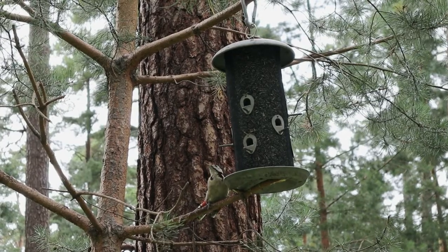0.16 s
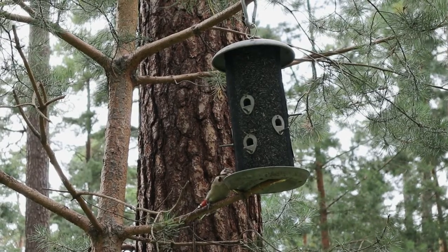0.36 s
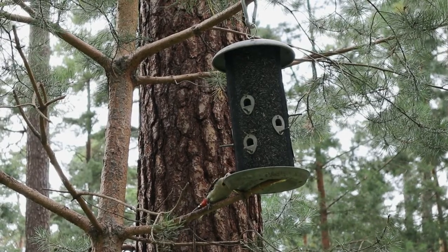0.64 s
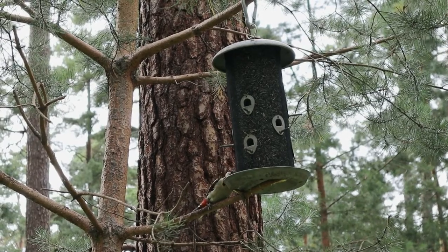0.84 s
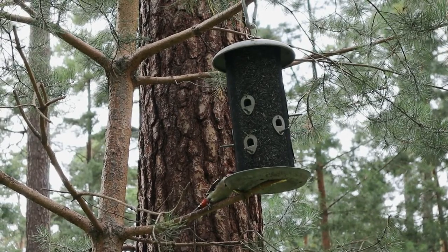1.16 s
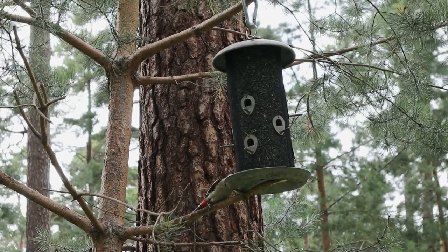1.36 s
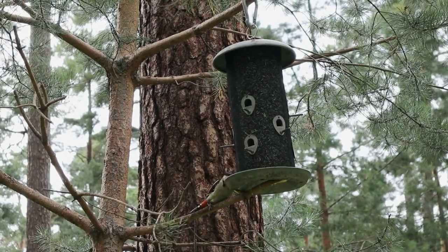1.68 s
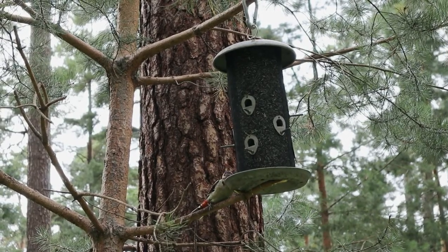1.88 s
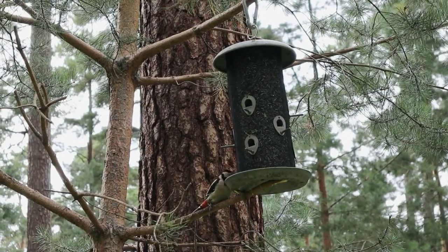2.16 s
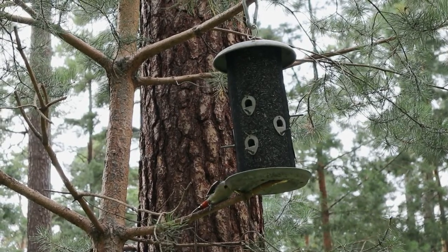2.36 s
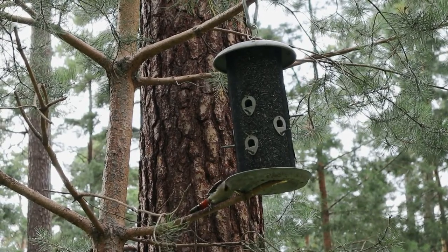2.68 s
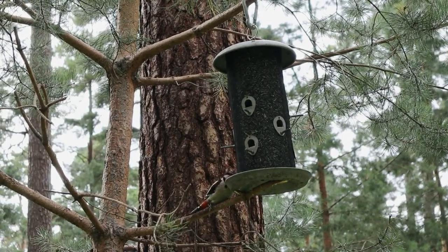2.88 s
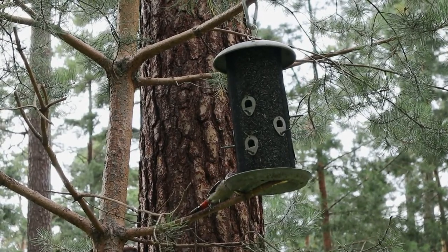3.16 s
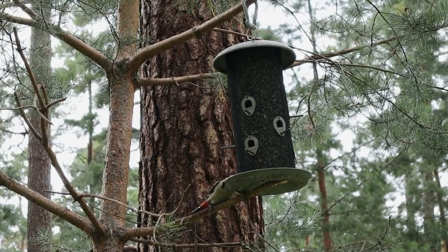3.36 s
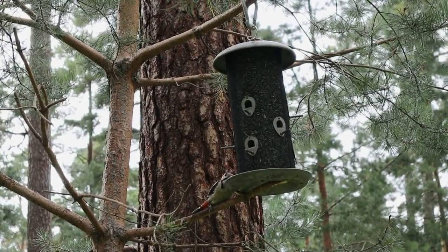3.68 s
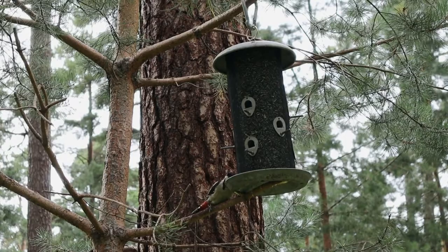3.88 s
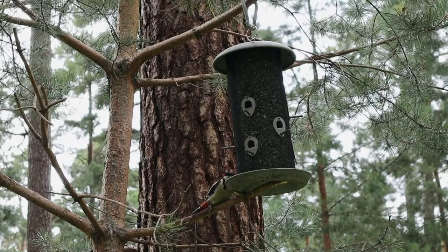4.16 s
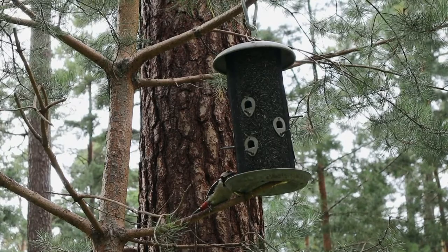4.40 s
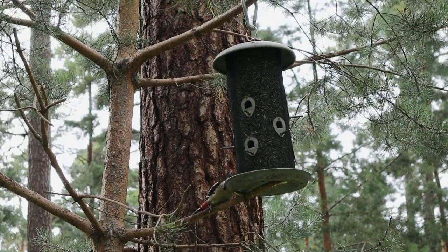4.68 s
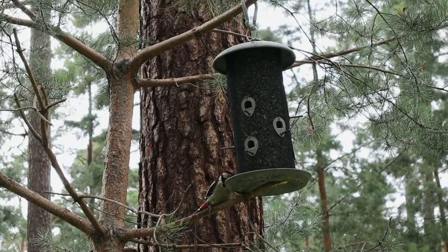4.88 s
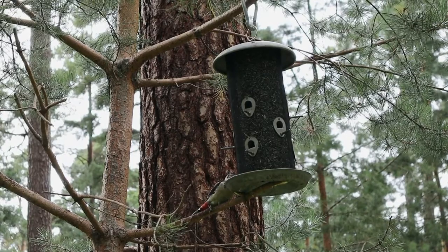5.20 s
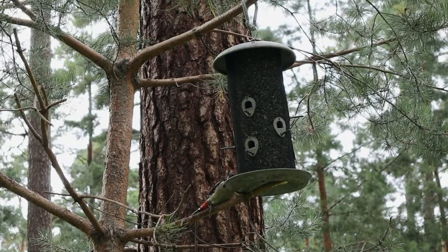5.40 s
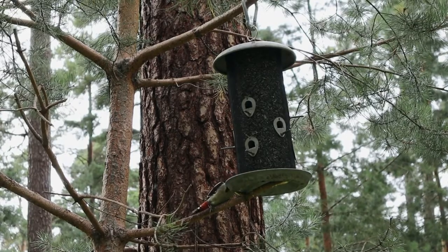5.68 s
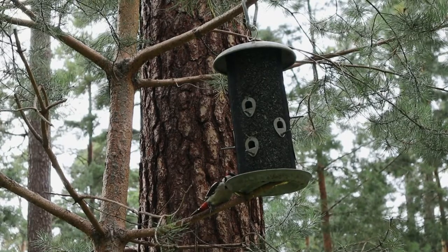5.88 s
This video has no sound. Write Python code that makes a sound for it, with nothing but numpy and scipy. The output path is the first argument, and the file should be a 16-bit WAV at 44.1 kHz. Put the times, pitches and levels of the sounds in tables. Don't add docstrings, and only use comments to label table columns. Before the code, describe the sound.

A quiet pine wood, heard through a close stereo pair: a steady, soft hum of distant traffic and air lies behind everything. In the first second, faint high trills and a few tiny bird chips, the clearest near 0.6 s, come from the side. Low wind puffs build to a strong microphone thump around 1.5 s, just as pecking begins. From 1.5 to 3.9 s a beak strikes seeds in a mesh feeder with irregular, crisp, bright cracks, densest from 2.2 to 3.3 s, preceded by short gritty scrapes and mixed with thin husk splits, falling crumbs and dull tray taps; a clear knock lands at 2.6 s. Short echoes scatter off trunks. Around 4 to 4.8 s it is nearly still, with a faint far trill, then a brighter chip at 4.8 s. Pecking resumes, with hard cracks at 5.15 and 5.5 s, small taps, last blows near 5.9 s, and more low wind buffets.

```python
import sys
import numpy as np
from scipy import signal
from scipy.io import wavfile
from scipy.ndimage import uniform_filter1d

SR = 44100
rng = np.random.default_rng(int(sys.argv[2]) if len(sys.argv) > 2 else 0)


def boost_factor(decibels):
    exponent = np.asarray(decibels, float) / 20
    return 10 ** exponent


def put_to_file(sound):
    columns = np.atleast_2d(sound).T
    safe = np.clip(columns, -1, 1)
    whole_steps = np.round(safe * 32767)
    wavfile.write(sys.argv[1], SR, whole_steps.astype(np.int16))


N = 266496

# [start t/s, end t/s, scrape level/dB, scrape f/Hz, rattle level at the end/dB]
PUSHES = [(1.488, 1.548, -61, 3550, -54.5), (1.825, 1.876, -64.5, 3500, -61.5),
          (2.15, 2.223, -64, 3450, -60.5), (2.458, 2.523, -63.5, 3680, -56.5),
          (2.776, 2.831, -70.5, 3420, -69.5), (3.038, 3.101, -64.5, 3560, -58.5),
          (3.772, 3.802, -73.5, 3577, -81.5), (4.809, 4.866, -63.5, 3940, -52),
          (5.096, 5.155, -68, 3920, -61.5), (5.446, 5.499, -65.5, 4060, -62.5),
          (5.78, 5.861, -62.5, 3520, -56)]


def evened(x):
    return x / np.sqrt(np.mean(x ** 2) + 1e-30)


def read(points, hz):
    f, value = np.transpose(points)
    return np.interp(np.log(hz + 1), np.log(f + 1), value)


def add(mix, s, sound):
    part = mix[..., round(s * SR):][..., :sound.shape[-1]]
    part += sound[..., :part.shape[-1]]


def sides(db):
    return boost_factor(np.array([[db / 2], [-db / 2]]))


def band_pass(low_hz, high_hz, x):
    return signal.sosfilt(signal.butter(2, [low_hz, high_hz], "band", fs=SR, output="sos"), x)


def field(spectrum, patchy_db, swell_db):
    # [f/Hz, correlation]
    likeness = [(60, 1), (130, .99), (290, .91), (640, .55), (1410, -.02), (3100, -.55), (6800, -.67)]
    frames, hz = N // 256 + 5, np.fft.rfftfreq(1024, 1 / SR)
    a, b, c, d, patches = rng.standard_normal((frames, 513, 5)).T
    patches = uniform_filter1d(patches, size=12, axis=0)
    patches = evened(uniform_filter1d(patches, size=14, axis=1))
    swell = evened(uniform_filter1d(rng.standard_normal(frames), size=60))
    same = np.clip(read(likeness, hz), -1, 1)[:, None]
    left, other = a + 1j * b, c + 1j * d
    z = np.array([left, same * left + np.sqrt(1 - same ** 2) * other])
    z *= boost_factor(read(spectrum, hz)[:, None] + patchy_db * patches + swell_db * swell)
    return evened(signal.istft(z, nperseg=1024, noverlap=768)[1][:, :N])


def echoes(x, against):
    # [f/Hz, t60/s]
    wood_t60 = [(2500, 0.29), (5000, 0.25), (9000, 0.15), (12300, 0.17), (12900, .03)]
    taps = rng.standard_normal((2, SR // 2)) * (rng.random((2, SR // 2)) < .12)
    taps[1] = -against * taps[0] + np.sqrt(1 - against ** 2) * taps[1]
    hz, t, z = signal.stft(taps, SR, nperseg=128)
    decay = boost_factor(-60 * t / read(wood_t60, hz)[:, None])
    tail = signal.istft(z * decay, SR, nperseg=128)[1]
    tail *= np.clip(np.arange(tail.shape[1]) / SR / 0.002, 0, 1)
    return signal.fftconvolve(x[None], tail / np.linalg.norm(tail[0]), axes=1)[:, :N]


def far_hum():
    # [f/Hz, level/dB per Hz]
    hum_spectrum = [(60, -9.5), (200, 1), (340, -6.5), (500, -7), (850, -1), (1300, -6.5), (1800, -13.5),
                    (2800, -21), (5000, -25.5), (8000, -31), (11800, -38), (12300, -49), (16000, -60.5)]
    return boost_factor(-64 + 3) * field(hum_spectrum, patchy_db=.8, swell_db=.4) * sides(-1.0)


def wind():
    # [t/s, rumble level/dB, left-right difference of the eddies/dB]
    gusts = [(0, -55.5, 4), (.4, -52, -7), (.95, -54.5, -7), (1.5, -46.5, -6), (1.9, -60, 0),
             (2.2, -56, -2), (2.6, -64, -1), (3.1, -61.5, -0.5), (3.35, -65.5, -3), (3.6, -58.5, 1.5),
             (4.199, -60.5, -2), (4.6, -56, 1), (5, -56.5, -1), (5.5, -55, -4), (6.04, -53.5, -9)]
    # [f/Hz, level/dB per Hz]
    rumble_spectrum = [(15, -15.5), (35, -2), (80, 3.5), (130, -13.5), (200, -13.5), (300, -24.5),
                       (450, -68)]
    # [t/s, peak level/dB, f/Hz, length/ms]
    strong_eddies = [(.199, -54, 68.5, 44), (.303, -46, 80, 14), (.36, -42.5, 113, 30),
                     (.453, -47, 118, 23), (.662, -53, 53.6, 37), (1.04, -49.5, 108, 41),
                     (1.111, -49.5, 70, 43), (1.267, -40.5, 90.5, 12), (1.317, -42.5, 90.5, 28),
                     (1.386, -35, 120, 20), (1.412, -35.5, 133.4, 5.4), (1.457, -25, 120, 19.5),
                     (1.479, -27.5, 157.6, 40), (1.5, -19.5, 122, 6.1), (1.59, -37.5, 177, 12),
                     (1.608, -34.5, 146, 31.6), (1.794, -38.5, 158, 48), (2.285, -46, 109, 12),
                     (3.183, -40, 143, 17.6), (3.21, -36.5, 106, 4.3), (3.514, -41.5, 118, 12),
                     (3.539, -43.5, 79, 57), (3.8, -61.5, 236, 34), (4.013, -52, 69.8, 21),
                     (4.411, -50.5, 66, 21), (4.534, -48, 101, 46), (5.095, -38.5, 61, 35),
                     (5.41, -34.5, 78, 38), (5.485, -34, 60.7, 21.5), (6.025, -44, 74.6, 27)]
    times, rumble_db, side_db = np.transpose(gusts)
    out = boost_factor(np.interp(np.arange(N) / SR, times, rumble_db))
    out = out * field(rumble_spectrum, patchy_db=3.0, swell_db=-3)

    light_db, light_hz, light_ms = -7, 75, 30
    at = .1 + (N / SR - .2) * rng.random(16)
    pitch = .8 + .4 * rng.random(16)
    light = np.c_[at, np.interp(at, times, rumble_db) + light_db, light_hz * pitch, light_ms + 0 * at]
    eddies, t = np.r_[strong_eddies, light], np.arange(-4400, 4400) / SR
    low_pass = signal.butter(4, 80, fs=SR, output="sos")
    churn = evened(signal.sosfilt(low_pass, rng.standard_normal((2, N + SR))))
    for (s, db, hz, ms), phase in zip(eddies, rng.random(len(eddies))):
        shape = np.exp(-.5 * (1000 * t / (.5 * ms)) ** 2)
        pan_db = np.interp(s, times, side_db) * hz / 120
        a, b = churn[:, round(s * SR):][:, :len(t)]
        lag = np.array([[0.00088 * hz * pan_db], [0]])
        turn = 2 * np.pi * (hz * t + phase) - lag
        eddy = ((1 + 0.34 * (a + 1j * b)) * np.exp(1j * turn)).real
        add(out, s + t[0], np.sqrt(2) * boost_factor(db) * shape * eddy * sides(pan_db))
    return out


def trills():
    # [start t/s, end t/s, f/Hz, level/dB]
    seeps = [
        (0.124, 0.264, 9200, -78),
        (0.358, 0.558, 9220, -79),
        (3.983, 4.12, 6970, -78.5),
    ]
    out = np.zeros((2, N))
    for s, end, hz, db in seeps:
        n = round((end - s) * SR)
        trill = evened(band_pass(hz * .96, hz * 1.04, rng.standard_normal((2, n)))) * np.hanning(n)
        add(out, s, boost_factor(db) * (trill - 0.62 * trill[::-1]))
    return out


def chips():
    # [t/s, length/s, top f/Hz, level/dB, left lead/rad]
    notes_sung = [
        (.166, .04, 7950, -56, 1.0),
        (.598, .047, 8050, -44, -1.6),
        (.355, .04, 4750, -69, -2.2),
        (.525, .035, 4800, -70, -2.1),
        (.655, .02, 7400, -64, 2.0),
        (.904, .02, 5400, -60, -1.8),
        (.904, .02, 10800, -67, -2.2),
        (4.787, .046, 7700, -48, -2.85),
    ]
    hook_per_s, drop_per_s = 10, 4.3
    near, far = np.zeros((2, N)), np.zeros(N)
    for s, length, top_hz, db, lead in notes_sung:
        pan_db = -3 + 1.2 * lead
        echo_db = max(-.6 * (db + 72), -12)
        hook = hook_per_s * max(length - .039, 0)
        u = np.linspace(0, 1, round(length * SR))
        bend = top_hz * (1 - np.array([hook, 0, drop_per_s * length]))
        hz = uniform_filter1d(np.interp(u, [0, .22, 1], bend), size=250, mode="nearest")
        turn = 2 * np.pi * np.cumsum(hz) / SR
        swell = np.sqrt(2) * boost_factor(db - 21 * abs(u - .65) / .65) * signal.windows.tukey(len(u), .4)
        add(near, s, swell * np.sin(turn + [[lead], [0]]) * sides(pan_db))
        add(far, s, swell * np.sin(turn) * boost_factor(echo_db))
    needles = evened(signal.oaconvolve(rng.standard_normal(N), np.hanning(70), "same"))
    return near + echoes(far * (.7 + .7 * needles), against=.5)


def crumbs(blows):
    first_db, follow, fade_db_per_s, longest_wait_s = -62.5, 0.33, -93.5, .085
    rows = []
    for (s, db, *_), waits in zip(blows, longest_wait_s * rng.random((len(blows), 4))):
        level_db = first_db + follow * (db + 35)
        rows += [(s + w, level_db + fade_db_per_s * w, 2.8, -7, 0) for w in waits]
    return rows


def beak():
    # [t/s, peak level/dB, length/ms, body below 5.5 kHz/dB, top above 9 kHz against middle/dB]
    blows = [(1.5191, -42, 1.6, -15, 14), (1.5307, -44, 5.2, -23, 0), (1.539, -30.5, 2.5, -17.5, 8),
             (1.8614, -38.5, 3, -18, 5.5), (1.8697, -31, 5.3, -16.5, 2), (2.2128, -34, 3.8, -12.5, 3),
             (2.2462, -38.5, 2.4, -11, -1), (2.285, -36, 3.4, -20, -8), (2.3674, -43, 1.8, -36, -2),
             (2.5061, -29.5, 6, -20, 12), (2.6582, -43, 1.5, -10, 1), (2.839, -35, 3.7, -26, -3.5),
             (2.8851, -37.5, 1.9, -37, 7), (2.9401, -38.5, 2.4, -12.5, -5.5), (3.0842, -32, 4.7, -16.5, 4),
             (3.2256, -32, 1.46, -26, 17), (3.8145, -32, 1.27, -15, 2.5), (5.1496, -27, 4.2, -10, 5),
             (5.49, -40, 1.7, -5, 9), (5.4962, -27, 2.35, -10.5, 21), (5.514, -36.5, 1.8, 17, -11),
             (5.5698, -38.5, 1.6, -3, 6), (5.8478, -32, 2.4, -37, 0), (5.9118, -34.5, 1.05, -40, 4)]
    # [t/s, peak level/dB, top/dB]
    husks = [(1.608, -53, 16), (1.9268, -51, 21), (2.2638, -39, 0.5), (2.2965, -48.5, 5),
             (2.3235, -55.5, -3), (2.3602, -48.5, -1), (2.433, -59.5, 16), (2.557, -49, 14),
             (2.5638, -47, 5), (2.896, -52, -8), (3.0651, -51.5, 3), (3.1794, -55.5, 5), (3.1899, -45.5, 1),
             (3.2345, -45, 8), (3.3643, -51.5, 17), (3.5831, -57.5, 9), (3.7813, -51, 1.5),
             (3.8074, -43, -3), (3.866, -58, -2), (3.9291, -62.5, 17.5), (4.8463, -51, -4),
             (4.858, -50, 12), (4.8864, -47.5, -8), (4.938, -54, 3), (4.9512, -53, -1), (5.2035, -53, 12),
             (5.759, -54.5, 5), (5.7717, -56, 2), (5.9192, -48, 12), (5.9558, -51.5, -11)]
    # [t/s, peak
    # level/dB, body/dB]
    tray_taps = [(0.635, -66.5, 6), (0.911, -69, 4), (2.1673, -60.5, 15), (2.254, -46, 2),
                 (2.303, -46.5, -14), (2.498, -51, 0), (2.605, -50, -5), (2.6251, -43, 1.5),
                 (2.648, -53, 1), (2.799, -61, 26), (2.925, -60, -2), (2.9646, -50, 8),
                 (3.0923, -41.5, -.5), (3.493, -69.5, 0), (3.8347, -53.5, 0), (4.812, -59.5, 16.5),
                 (5.138, -50.5, -12), (5.4733, -53, 8), (5.5295, -60, 23), (5.5568, -52, -1),
                 (5.577, -45.5, -16), (5.589, -46, -2), (5.601, -50.5, -13), (5.6145, -54, -9),
                 (5.6573, -65.5, 0), (5.749, -64, -1), (5.7962, -48.5, 4), (5.8633, -50, -5),
                 (5.929, -61, -10), (6.002, -65, -5)]
    husk_ms, husk_body_db = 2.95, -17.5
    tap_ms, tap_top_db = 2.5, 0.5
    rows = blows + [(s, db, husk_ms, husk_body_db, top_db) for s, db, top_db in husks]
    rows += [(s, db, tap_ms, body_db, tap_top_db) for s, db, body_db in tray_taps]
    return rows + crumbs(blows)


def crackle(spread_db, shared, count=1):
    steps = rng.standard_normal((count + 1, N // 16 + 1))
    size = boost_factor(spread_db * (.7 * steps[0] + .7 * steps[1:]))
    size = np.repeat(size, 16, axis=1)[:, None, :N]
    size /= np.sqrt(uniform_filter1d(size ** 2, size=130))
    common, own = rng.standard_normal((count, 1, N)), rng.standard_normal((count, 2, N))
    return size * (np.sqrt(shared) * common + np.sqrt(1 - shared) * own)


def causal(db):
    log = np.log(boost_factor(np.maximum(db, -100)))
    log = np.r_[log, log[-2:0:-1]]
    ring = np.fft.ifft(np.exp(log - 1j * signal.hilbert(log).imag)).real[:1024]
    return ring / np.linalg.norm(ring)


def mesh_rings():
    # [f/Hz, level/dB per Hz]
    crack = [(1500, -45), (2500, -31.5), (3100, -19), (5700, -6), (7300, 0), (9000, -1.5), (11500, -3),
             (12400, -14.5), (12800, -21), (15500, -33), (16200, -59.5)]
    # [f/Hz, width/Hz, level above the crack/dB]
    mesh = [(4330, 150, 6), (4910, 200, 3), (6100, 150, 5), (7120, 220, 4), (7690, 250, 3), (9330, 300, 3),
            (9950, 300, 3), (11280, 250, 4)]
    splits_hz = [3600, 5500, 7200, 9000, 10600, 12650]
    hz = np.fft.rfftfreq(4096, 1 / SR)
    colour = read(crack, hz) + sum(db / (1 + (2 * (hz - f) / w) ** 2) for f, w, db in mesh)
    below = [0 * hz] + [1 / (1 + (hz / f) ** 12) for f in splits_hz] + [1 + 0 * hz]
    return np.array([causal(colour + 10 * np.log10(m + 1e-12)) for m in np.diff(below, axis=0)])


def pecks():
    strikes = beak()
    drive, t = np.zeros((7, N)), np.arange(-200, 2000) / SR
    for (s, db, ms, body_db, top_db), spot in zip(strikes, rng.standard_normal((len(strikes), 6))):
        share = boost_factor(np.array([body_db, -top_db / 2, top_db / 2])) ** 2
        share[1:] /= share[1:].sum()
        share = np.repeat(share, 2) * boost_factor(11.0 * spot)
        u = 1000 * t / ms
        blow = boost_factor(db - np.where(u < 0, -22 * u, 9 * abs(u) ** 1.2))
        snap = boost_factor(-27.0 + .6 * (db + 28.0))
        add(drive, s + t[0], np.r_[np.sqrt(share / share.sum()), snap][:, None] * blow)
    for start, end, _, _, db in PUSHES:
        add(drive[2:6], start, boost_factor(db + np.linspace(-26, 0, round((end - start) * SR))))
    cracks = drive[:, None] * crackle(spread_db=8., shared=.52, count=7)
    return signal.oaconvolve(cracks, mesh_rings()[:, None], axes=2).sum(0)[:, :N]


def scrapes():
    out, grit = np.zeros((2, N)), crackle(spread_db=3.0, shared=0.49)[0]
    for start, end, db, hz, _ in PUSHES:
        part = grit[:, round(start * SR):round((end + .02) * SR)]
        scrape = evened(band_pass(hz * 0.9, hz * 1.21, part))
        add(out, start, boost_factor(db) * scrape * signal.windows.tukey(part.shape[1], .4))
    return out


def knocks():
    # [t/s, level/dB, f/Hz, t60/s]
    tray_knocks = [
        (2.626, -49, 2700, .045),
        (2.796, -62, 3450, .04),
        (5.151, -53, 2100, .04),
        (5.515, -48, 2100, .055),
        (4.256, -72, 2050, .05),
    ]
    out, t = np.zeros((2, N)), np.arange(4000) / SR
    for s, db, hz, t60 in tray_knocks:
        modes = sum(np.sin(2 * np.pi * k * hz * t) for k in (.92, 1, 1.13)) / 2
        add(out, s, boost_factor(db - 60 * t / t60) * np.tanh(t / 0.00075) * modes)
    return out


def scene():
    feeder = (pecks() + scrapes() + knocks()) * sides(-1.5)
    wood = boost_factor(-12.5) * echoes(feeder.sum(0), against=.45)
    return far_hum() + wind() + trills() + chips() + feeder + wood


def band_limit(x):
    return signal.sosfilt(signal.butter(12, 16410, fs=SR, output="sos"), x)


def record(dry):
    return band_limit(dry)


dry = scene()
out = record(dry)
put_to_file(out)
```